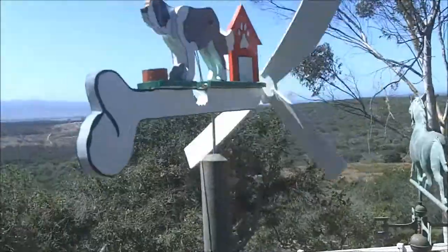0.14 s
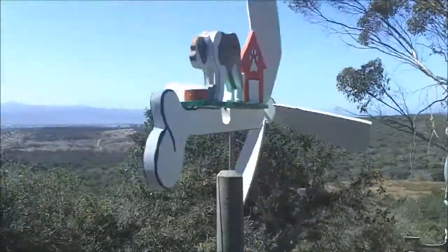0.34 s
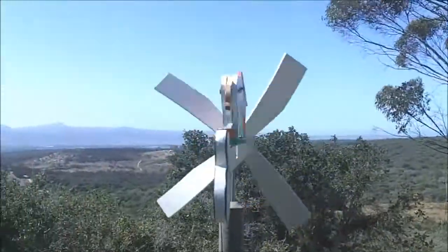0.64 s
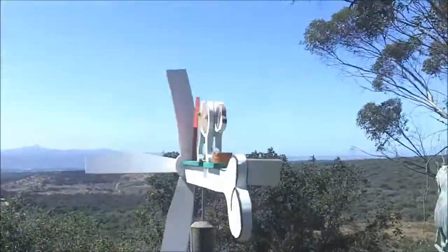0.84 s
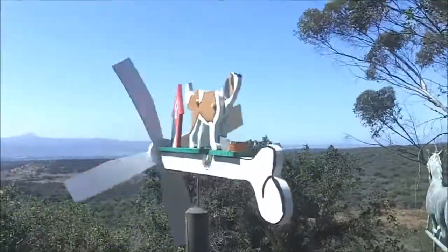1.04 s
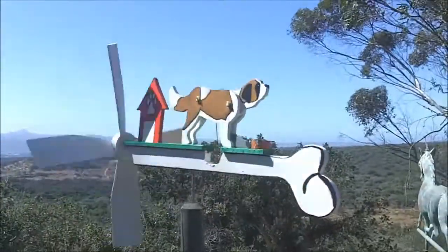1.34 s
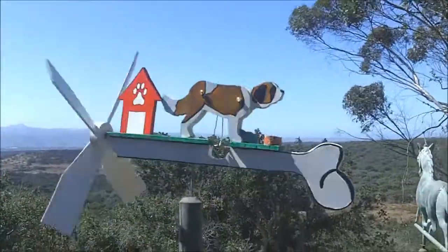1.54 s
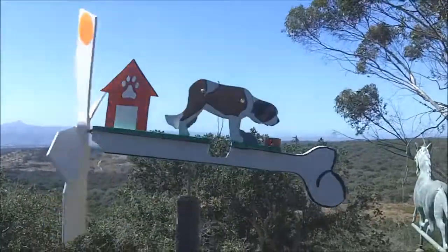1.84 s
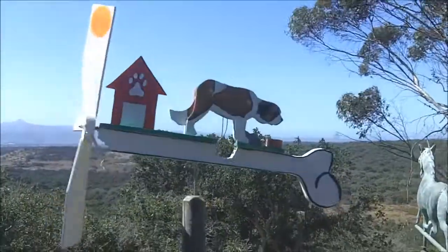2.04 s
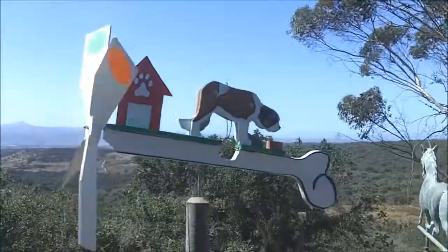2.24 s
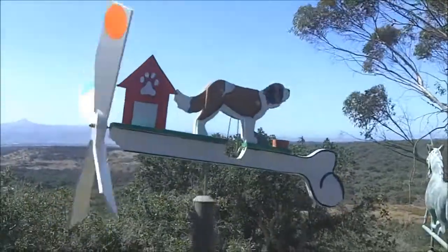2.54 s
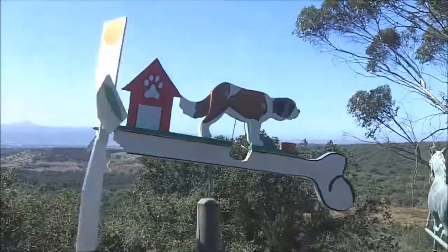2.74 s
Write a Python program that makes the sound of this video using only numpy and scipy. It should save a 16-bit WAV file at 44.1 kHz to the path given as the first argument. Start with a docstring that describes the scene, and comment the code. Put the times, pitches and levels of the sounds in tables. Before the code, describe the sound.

Strong wind noise rumbles and thumps on a camera microphone, with faint gritty handling rubs

```python
"""Open hillside: gusty wind on a hand-held camera.
Turbulence is shaped noise, a deep roll under lumpy buffeting; large eddies thump as two-sided pulses.
The flow breaks up into short bursts of slaps and flaps, and small eddies pop as random filtered clicks.
Something close by, probably a hand on the camera, rubs in dry, gritty strokes: dense slips and sharp
catches ringing a small hard shell. A faint, patchy outdoor hiss lies behind."""
import sys
import numpy as np
from scipy import signal
from scipy.fft import rfft, irfft
from scipy.io import wavfile
from scipy.ndimage import uniform_filter1d

SR = 44100
rng = np.random.default_rng(int(sys.argv[2]) if len(sys.argv) > 2 else 0)


def transcribe(signal):
    """Save signal, clipped to [-1, 1], as a 16-bit WAV file at the path in sys.argv[1]."""
    frames = np.atleast_2d(signal).T
    limited = np.clip(frames, -1, 1)
    pcm = np.round(limited * 32767).astype(np.int16)
    wavfile.write(sys.argv[1], SR, pcm)


N = 127449

# Event and wind levels are nominal, before the trims below. Spectra are relative gains.
# wind strength: time_s [s], deep_db [dB], buffet_db [dB]
WIND = [(0.0, -31, -40.5), (0.12, -22.5, -28), (0.25, -19, -27.5), (0.33, -19.5, -36), (0.56, -25, -39.5),
        (0.63, -23, -39.5), (0.99, -22.5, -36), (1.13, -16.5, -27.5), (1.28, -23.5, -32.5),
        (1.46, -16, -28.5), (1.51, -23.5, -42), (1.7, -17.5, -24.5), (2.11, -23.5, -43.5),
        (2.16, -20.5, -25), (2.2, -26.5, -42.5), (2.32, -22, -26), (2.37, -20.5, -29.5),
        (2.59, -16.5, -24.5), (2.89, -25, -35.5)]
# spectrum of the deep roll: freq_hz [Hz], gain_db [dB]
RUMBLE_SPECTRUM = [(4, -6.5), (12, 6), (35, 3), (55, -3.5), (90, -5.5), (130, -10), (220, -25),
                   (500, -103.5)]
# spectrum of the buffeting: freq_hz [Hz], gain_db [dB]
BUFFET_SPECTRUM = [(40, -14), (110, -10.5), (170, 2), (280, -7.5), (450, -18.5), (800, -40), (1500, -44),
                   (6000, -110)]
# large eddies: peak_s [s], peak_db [dB], half_width_s [s]
THUMPS = [(0.114, -4, 0.0031), (0.121, -3, 0.0029), (0.19, -4, 0.0019), (0.208, -6.5, 0.0023),
          (0.271, -1.5, 0.0019), (0.334, -13.5, 0.0047), (0.477, -12.5, 0.0022), (0.513, -10, 0.0088),
          (0.681, -5, 0.0036), (.75, -15, 0.0019), (1.026, -8, 0.003), (1.134, -12, 0.0011),
          (1.224, -11, .003), (1.662, -7, 0.0022), (1.691, -5, 0.0027), (1.849, -15, 0.0058),
          (1.88, -8, 0.0017), (2.077, -6, 0.0041), (2.25, -12.5, 0.003), (2.307, 1.5, 0.0022),
          (2.377, -7.5, 0.0027), (2.408, -9, 0.0035), (2.448, -7, 0.0017), (2.54, -5, 0.00085),
          (2.591, -4.5, 0.0015), (2.616, -2, 0.00094), (2.644, -5, 0.0025), (2.717, -6.5, 0.0048),
          (2.818, -13, 0.0017)]
# bursts of fine turbulence: centre_s [s], level_db [dB], length_s [s], roll_off_hz [Hz]
BURSTS = [(0.149, -25.5, 0.004, 424), (0.1531, -28, 0.00096, 424), (0.1603, -16.5, 0.0015, 296),
          (0.1994, -27.5, 0.0012, 240), (0.211, -26, 0.0013, 450), (0.215, -24, 0.0014, 324),
          (0.228, -27.5, 0.0046, 233), (0.2707, -21.5, 0.0013, 252), (0.2862, -16.5, 0.0016, 262),
          (0.351, -33.5, 0.001, 1530), (0.385, -24.5, 0.0021, 556), (0.399, -23.5, 0.0033, 313),
          (0.4128, -23.5, 0.004, 556), (0.478, -34, 0.0056, 228), (0.638, -33.5, 0.0017, 346),
          (0.648, -29, 0.0056, 298), (0.657, -24.5, 0.0026, 810), (0.6684, -25.5, 0.0015, 615),
          (0.680, -20, 0.0015, 477), (0.689, -29, 0.005, 473), (0.826, -35.5, 0.0042, 216),
          (0.942, -35, 0.0025, 190), (1.0612, -27, 0.0016, 282), (1.127, -27.5, 0.0017, 268),
          (1.14, -26, 0.0026, 330), (1.156, -20, 0.0029, 260), (1.1708, -17.5, 0.0012, 590),
          (1.223, -26.5, 0.0017, 332), (1.2677, -31, 0.0091, 410), (1.334, -29, 0.0038, 505),
          (1.365, -25.5, 0.00093, 420), (1.381, -28, 0.0035, 230), (1.411, -23.5, 0.0019, 330),
          (1.4207, -19, 0.0011, 514), (1.427, -23, 0.006, 360), (1.4451, -13.5, 0.00077, 517),
          (1.4485, -22.5, 0.0047, 467), (1.484, -30, 0.0011, 274), (1.644, -35.5, 0.0015, 380),
          (1.66, -24.5, 0.0018, 252), (1.6752, -15, 0.0017, 453), (1.69, -31.5, 0.0066, 302),
          (1.7428, -16.5, 0.00083, 585), (1.852, -22.5, 0.0056, 288), (1.87, -27.5, 0.0043, 420),
          (1.9563, -23.5, 0.0019, 222), (1.973, -31.5, 0.0015, 300), (2.0907, -31, 0.0023, 253),
          (2.1385, -20, 0.00079, 200), (2.1455, -26.5, 0.00067, 290), (2.245, -31.5, 0.0014, 300),
          (2.3043, -23, 0.00087, 330), (2.3116, -12.5, 0.0024, 335), (2.3333, -26.5, 0.0013, 310),
          (2.351, -13.5, 0.002, 275), (2.385, -31, 0.00091, 200), (2.4274, -26.5, 0.0013, 400),
          (2.527, -26.5, 0.0023, 280), (2.5465, -20, 0.0018, 265), (2.5605, -25.5, 0.0031, 250),
          (2.575, -30, 0.0066, 380), (2.588, -29, 0.001, 620), (2.6122, -15, 0.0027, 603),
          (2.617, -22, 0.0014, 400), (2.648, -24.5, 0.0073, 417), (2.6695, -30.5, 0.00062, 620),
          (2.685, -20, 0.0013, 252), (2.701, -32, 0.0048, 380), (2.7178, -27.5, 0.0014, 695),
          (2.7237, -23.5, 0.0015, 230), (2.74, -31, 0.0052, 382), (2.8224, -19, 0.0017, 323)]
# rubbing strokes: start_s [s], length_s [s], level_db [dB]
RUBS = [(0.023, 0.073, -47.5), (0.056, 0.063, -43.5), (0.121, 0.054, -54.5), (0.215, 0.0077, -48.5),
        (0.265, 0.029, -53.5), (0.395, 0.051, -47), (0.54, 0.053, -52.5), (0.636, 0.098, -51.5),
        (0.754, 0.166, -63), (0.938, 0.073, -42.5), (1.028, 0.033, -47), (1.081, 0.055, -47.5),
        (1.158, 0.017, -52), (1.224, 0.084, -40), (1.36, 0.071, -52.5), (1.538, 0.011, -57.5),
        (1.579, 0.045, -51.5), (1.641, 0.026, -51.5), (1.706, 0.021, -46), (1.748, 0.087, -52.5),
        (2.159, 0.25, -67), (2.46, 0.042, -49.5), (2.518, 0.073, -52)]
# sharp catches of the rubbing surfaces: start_s [s], level_db [dB], ring_hz [Hz]
CATCHES = [(0.08, -30, 7300), (0.1232, -27, 3300), (0.1844, -40, 6100), (0.2083, -40, 6300),
           (0.2705, -40, 6340), (0.2937, -33, 6390), (0.324, -39.5, 6160), (0.438, -31, 7380),
           (0.5123, -43, 6630), (0.982, -31.5, 7400), (1.0502, -33, 7130), (1.061, -29.5, 6170),
           (1.17, -35, 6720), (1.5839, -36.5, 8430), (2.158, -48, 6370), (2.218, -37, 6400),
           (2.491, -35, 7670), (2.558, -36.5, 6530), (2.5762, -38, 7060), (2.663, -47, 6280)]
# resonance of the rubbed shell: freq_hz [Hz], gain_db [dB]
SHELL_SPECTRUM = [(300, -29), (1200, -13.5), (2200, -4), (2850, -5.5), (3250, -1.5), (3900, -6.5),
                  (4450, 0), (5400, -10.5), (6400, 4), (7300, 5.5), (8200, -4), (10000, -8), (11500, -13.5),
                  (14000, -22.5), (15500, -36)]
# spectrum of the outdoor hiss: freq_hz [Hz], gain_db [dB]
AIR_SPECTRUM = [(700, 0), (1500, -1.5), (2500, -5), (4000, -10.5), (6800, -10), (8500, -17), (11000, -24),
                (15000, -39)]
# level of the outdoor hiss: time_s [s], level_db [dB]
AIR_LEVEL = [(0, -54), (.8, -62.5), (1.3, -56), (1.95, -60), (2.33, -53.5), (2.55, -63), (2.72, -64.5),
             (2.89, -61.5)]

AIR_PATCHY_DB = 2.2
RUB_TRIM_DB, RUB_ATTACK_S, RUB_RELEASE_S, RUB_PATCHY_DB = 0.5, 0.0036, 0.0054, 4.5
RUB_SMOOTH = 0.85  # steady share added to grit of rms 1
SLIPS_PER_S, SLIP_SPREAD_DB, SLIP_DECAY_S = 380, 2.5, 0.0012
CATCH_TRIM_DB, CATCH_RISE_S, CATCH_FALL_S = -6.5, 0.00018, 0.0043
CATCH_WIDTH_HZ, CATCH_RING_GAIN = 112, 6.3
EDDIES_PER_S, EDDY_SPREAD_DB, EDDY_ROLL_OFF_HZ, EDDY_TRIM_DB = 80, 2.5, (150, 300), -11.5
LOW_CUT_HZ = 154  # bursts and small eddies
BURST_TRIM_DB, BURST_SHAPE = 0, 1.1
BURST_TOP_RATIO = 4.5  # steep upper limit / roll-off
BURST_BAND_HZ = 300  # burst levels count the sound above this
FLAPS_PER_S, FLAP_SPREAD_DB, SLAP_S = 750, 4, 0.003
THUMP_TRIM_DB, TICK_TRIM_DB, TICK_S = -1, -27, 0.00005
BUFFET_TRIM_DB, BUFFET_LUMPY_DB, DEEP_LUMPY_DB, LUMP_HZ = -6, 4.5, 3, 40
PORT_DB, BALANCE_DB = -54.5, 0.27  # port: opposed rumble; balance: left over right
NOTCH_HZ, NOTCH_WIDTH_HZ, NOTCH_DB = 5434, 350, -13.5
EDGE_HZ, SELF_NOISE_DB, FADE_S = 15600, -82, 0.005


def amp(db):
    """Decibels to gain."""
    return 10 ** (np.asarray(db) / 20)


def unit(x):
    """Scales to an rms of 1."""
    return x / np.sqrt(np.mean(x ** 2) + 1e-20)


def curve(points, column=1):
    """A control curve, one value per sample."""
    rows = np.array(points)
    return np.interp(np.arange(N) / SR, rows[:, 0], rows[:, column])


def spectrum(points):
    """Gain per frequency bin, interpolated over log frequency."""
    hz, db = np.transpose(points)
    bins_hz = np.fft.rfftfreq(N, 1 / SR)
    return amp(np.interp(np.log(bins_hz + 1), np.log(hz), db))


def noise(points):
    """Steady noise of a given colour, rms 1."""
    white = rng.standard_normal(N)
    return unit(irfft(rfft(white) * spectrum(points), N))


def steadied(x, span_s):
    """Evens out the chance swells of a noise that last longer than the span."""
    size = max(int(span_s * SR), 8)
    power = uniform_filter1d(uniform_filter1d(x ** 2, size), size)
    return x / np.sqrt(abs(power) + 1e-6)


def patchy(x, depth_db):
    """Lets the colour wander in patches about 500 Hz wide and 20 ms long."""
    z = signal.stft(x, nperseg=512, noverlap=384)[2]
    field = rng.standard_normal(z.T.shape)
    field = uniform_filter1d(field, size=7, axis=0)  # time
    field = unit(uniform_filter1d(field, size=6, axis=1)).T  # frequency
    gain = amp(depth_db * (field - depth_db / 9))  # offset holds the mean power
    return signal.istft(z * gain, nperseg=512, noverlap=384)[1][:N]


def add(mix, start_s, sound):
    """Mixes a sound in, cut to fit."""
    start = round(start_s * SR)
    sound = sound[max(-start, 0):]
    part = mix[max(start, 0):][:len(sound)]
    part += sound[:len(part)]


def outdoor_hiss():
    """Coloured noise with a wandering spectrum and a slow level curve."""
    return patchy(noise(AIR_SPECTRUM), AIR_PATCHY_DB) * amp(curve(AIR_LEVEL))


def stroke_force():
    """Sum of strokes, each with an exponential attack before it and release after it."""
    t = np.arange(N) / SR
    force = np.zeros(N)
    for start_s, length_s, level_db in RUBS:
        attack = np.minimum(t - start_s, 0) / RUB_ATTACK_S
        release = np.maximum(t - start_s - length_s, 0) / RUB_RELEASE_S
        force += amp(level_db) * np.exp(attack - release)
    return force


def add_catches(drive):
    """Brief noise scrapes, each peaked at its own ring frequency."""
    t, hz = np.arange(1024) / SR, np.fft.rfftfreq(1024, 1 / SR)
    envelope = (1 - np.exp(-t / CATCH_RISE_S)) * np.exp(-t / CATCH_FALL_S)
    envelope /= envelope.max()
    for start_s, level_db, ring_hz in CATCHES:
        ring = 1 + CATCH_RING_GAIN / (1 + ((hz - ring_hz) / CATCH_WIDTH_HZ) ** 2)
        scrape = unit(irfft(rfft(rng.standard_normal(len(t))) * ring))
        add(drive, start_s, amp(level_db + CATCH_TRIM_DB) * envelope * scrape)


def rubbing():
    """Tiny slips crowd under each stroke, with a few sharp catches; all ring a small hard shell."""
    slip_gain = amp(SLIP_SPREAD_DB * np.minimum(rng.exponential(1, N), 4))
    slips = (rng.random(N) < SLIPS_PER_S / SR) * slip_gain
    decay = np.exp(-np.arange(1024) / SR / SLIP_DECAY_S)
    grit = unit(signal.oaconvolve(slips, decay)[:N]) + RUB_SMOOTH
    rasp = steadied(grit * rng.standard_normal(N), 0.052)
    drive = amp(RUB_TRIM_DB) * stroke_force() * patchy(rasp, RUB_PATCHY_DB)
    add_catches(drive)
    return irfft(rfft(drive) * unit(spectrum(SHELL_SPECTRUM)), N)


def eddies():
    """Small eddies pop against the microphone at random, harder in a stronger wind."""
    out, hz = np.zeros(N), np.fft.rfftfreq(N, 1 / SR)
    rate_per_s = EDDIES_PER_S / len(EDDY_ROLL_OFF_HZ)
    for roll_off_hz in EDDY_ROLL_OFF_HZ:
        hits = (rng.random(N) < rate_per_s / SR) * rng.choice([-1, 1], N)
        hits = hits * amp(EDDY_SPREAD_DB * np.minimum(rng.exponential(1, N), 2))
        low_cut = 1j * hz / (LOW_CUT_HZ + 1j * hz)
        out += unit(irfft(rfft(hits) * np.exp(-hz / roll_off_hz) * low_cut, N))
    return out * amp(curve(WIND, 2) + EDDY_TRIM_DB)


def bursts():
    """The flow breaks up: the briefest bursts are mostly one sharp slap, longer ones a flutter of flaps."""
    out, t, hz = np.zeros(N), np.arange(-2048, 2048) / SR, np.fft.rfftfreq(4096, 1 / SR)
    low_cut = hz ** 2 / (hz ** 2 + LOW_CUT_HZ ** 2)
    for centre_s, level_db, length_s, roll_off_hz in BURSTS:
        top_cut = 1 / np.sqrt(1 + (hz / (BURST_TOP_RATIO * roll_off_hz)) ** 10)
        colour = np.exp(-hz / roll_off_hz) * low_cut * top_cut

        flaps = (rng.random(len(t)) < FLAPS_PER_S / SR) * rng.choice([-1, 1], len(t))
        flaps = flaps * amp(FLAP_SPREAD_DB * rng.standard_normal(len(t)))
        flutter = rfft(unit(flaps * np.exp(-abs(t / length_s) ** BURST_SHAPE)))
        slap = rfft(unit(1. * (t == 0))) * np.exp(2j * np.pi * rng.random())
        slap_share = np.exp(-(length_s / SLAP_S) ** 2)
        burst = np.sqrt(slap_share) * slap + np.sqrt(1 - slap_share) * flutter

        # flatten the broad spectrum, then colour it
        broad_power = uniform_filter1d(uniform_filter1d(abs(burst) ** 2, size=35), size=35)
        burst = burst / np.sqrt(broad_power) * colour
        size = np.linalg.norm(irfft(burst * (hz > BURST_BAND_HZ)))
        gain = np.sqrt(length_s * SR) * amp(level_db + BURST_TRIM_DB) / size
        add(out, centre_s + t[0], irfft(burst) * gain)
    return out


def thumps():
    """Large eddies push and suck the diaphragm in turn, each with a faint tick on its rising flank."""
    out, t = np.zeros(N), np.arange(-2048, 2048) / SR
    age = t[t >= 0] / TICK_S
    tick = age * np.exp(-age)
    for k, (peak_s, peak_db, half_width_s) in enumerate(THUMPS):
        sign = (-1) ** k
        pulse = np.hanning(len(t)) * (1 + (t / half_width_s) ** 2 / 2) ** -2
        add(out, peak_s + t[0], sign * amp(peak_db + THUMP_TRIM_DB) * pulse)
        add(out, peak_s - half_width_s, sign * amp(peak_db + TICK_TRIM_DB) * tick)
    return out


def rumble():
    """Pressure of the turbulent air: a deep roll, and lumpy buffeting above it."""
    lumps = noise([(1, 0), (LUMP_HZ, 0), (4 * LUMP_HZ, -130)])
    deep_db = curve(WIND, 1) + DEEP_LUMPY_DB * lumps
    buffet_db = curve(WIND, 2) + BUFFET_TRIM_DB + BUFFET_LUMPY_DB * lumps
    deep = steadied(noise(RUMBLE_SPECTRUM), 0.073) * amp(deep_db)
    buffet = steadied(noise(BUFFET_SPECTRUM), 0.018) * amp(buffet_db)
    return deep + buffet


def scene():
    """All layers reach both channels almost alike; a little rumble differs between the microphone ports."""
    mono = outdoor_hiss() + rubbing() + eddies() + bursts() + thumps() + rumble()
    balance = amp([[BALANCE_DB / 2], [-BALANCE_DB / 2]])
    port_difference = amp(PORT_DB) * rumble() * np.array([[1], [-1]])
    return mono * balance + port_difference


def record(dry):
    """The camera overloads at full scale, adds a little hiss, and has a treble notch and a band limit."""
    hz, t = np.fft.rfftfreq(N, 1 / SR), np.arange(N) / SR
    held = dry / (1 + dry ** 8) ** (1 / 8)
    edge = np.minimum(np.minimum(t, t[::-1]) / FADE_S, 1)
    fade = np.sin(np.pi / 2 * edge) ** 2
    hiss = amp(SELF_NOISE_DB) * np.array([noise(SHELL_SPECTRUM), noise(SHELL_SPECTRUM)])
    notch = amp(NOTCH_DB / (1 + ((hz - NOTCH_HZ) / NOTCH_WIDTH_HZ) ** 2))
    out = irfft(rfft(held * fade + hiss) * notch, N)
    band_limit = signal.firwin(511, EDGE_HZ, window=("kaiser", 9), fs=SR)
    return signal.oaconvolve(out, band_limit[None], "same")


dry = scene()
out = record(dry)
transcribe(out)
```